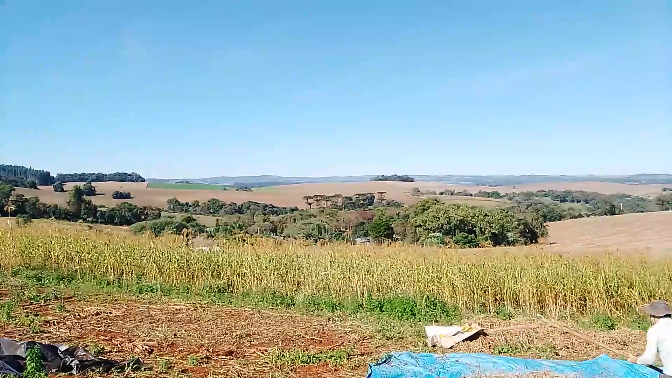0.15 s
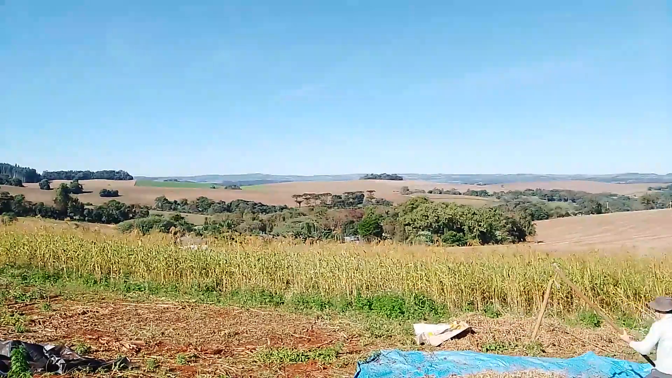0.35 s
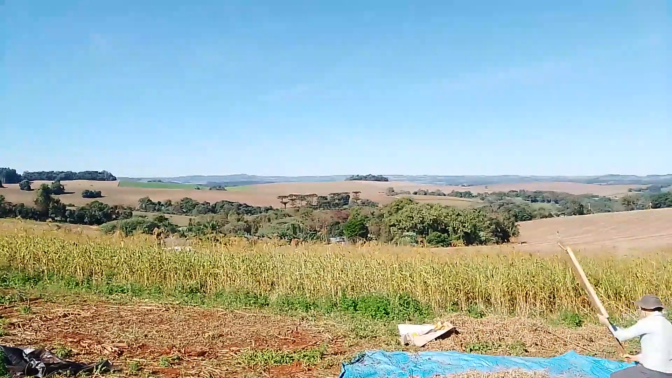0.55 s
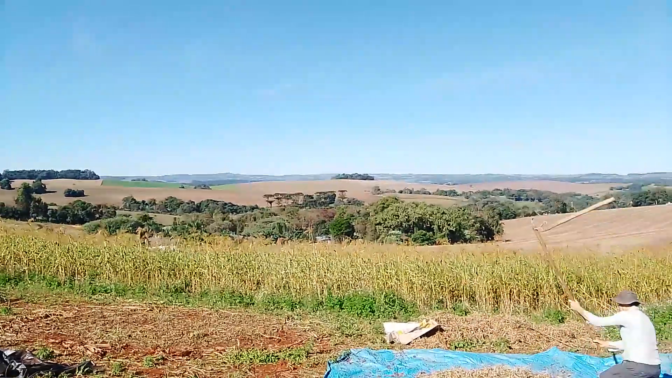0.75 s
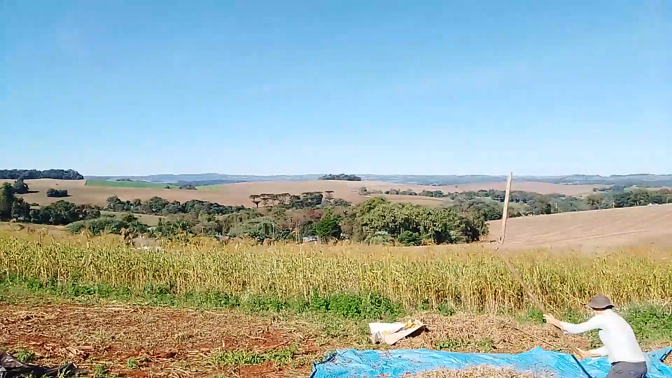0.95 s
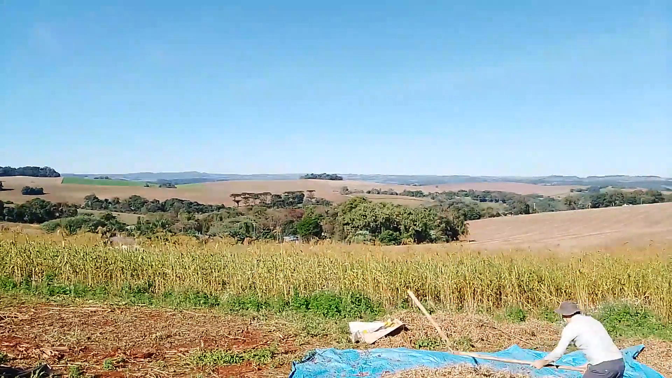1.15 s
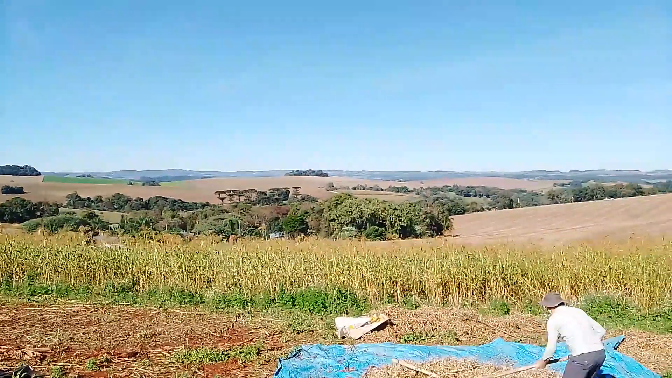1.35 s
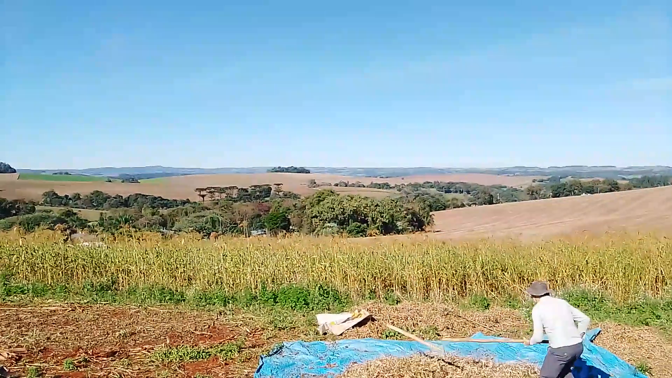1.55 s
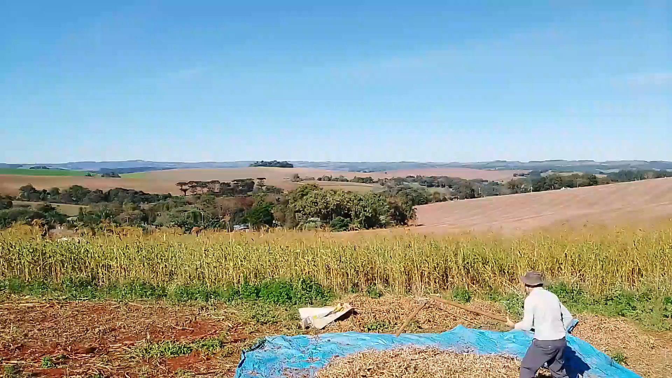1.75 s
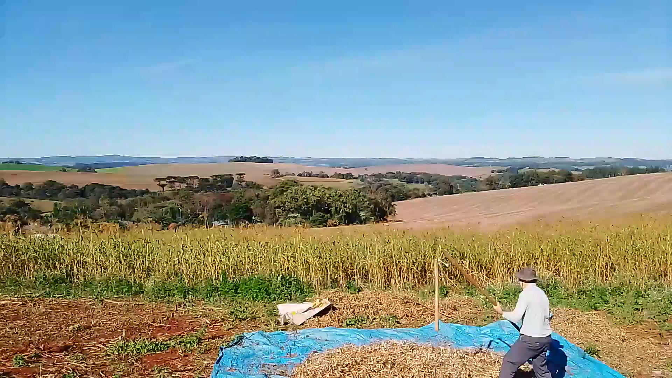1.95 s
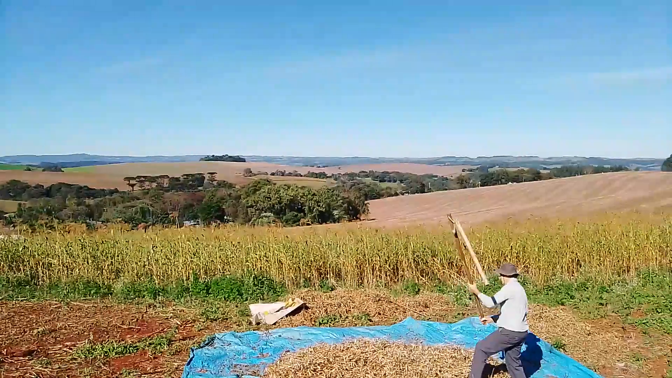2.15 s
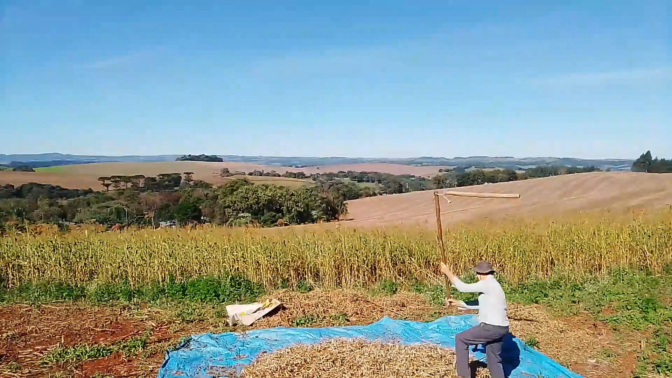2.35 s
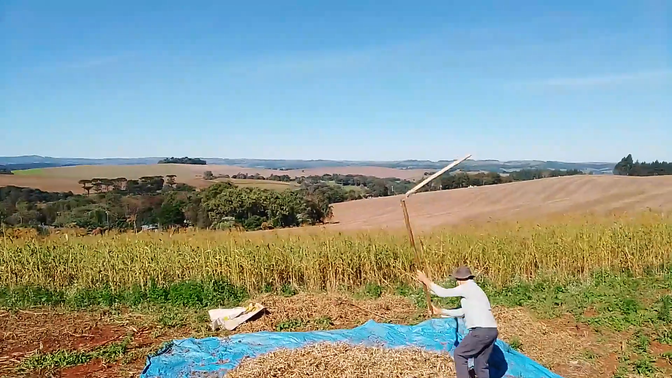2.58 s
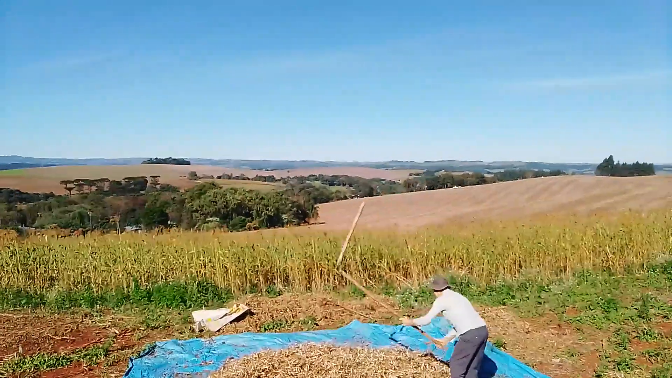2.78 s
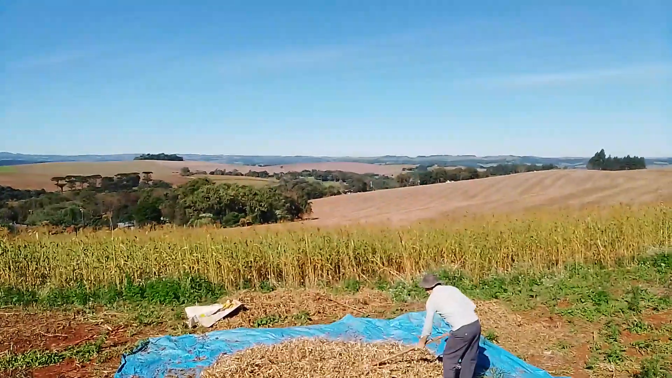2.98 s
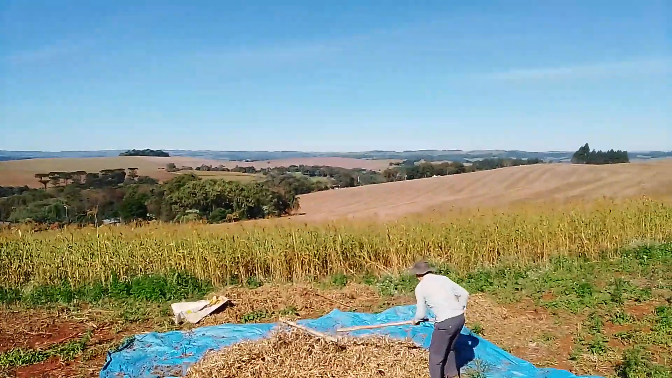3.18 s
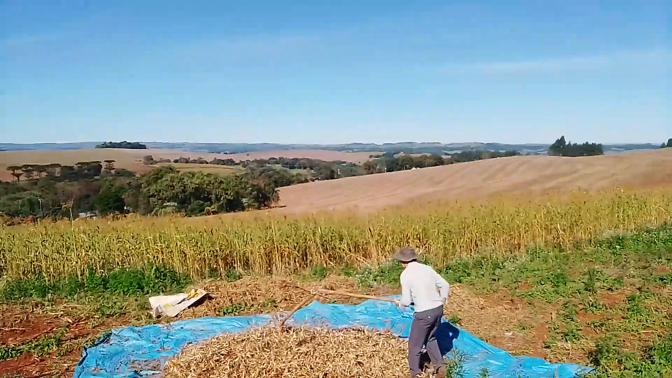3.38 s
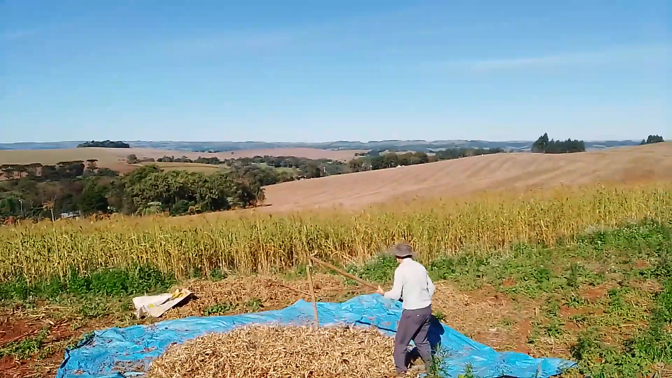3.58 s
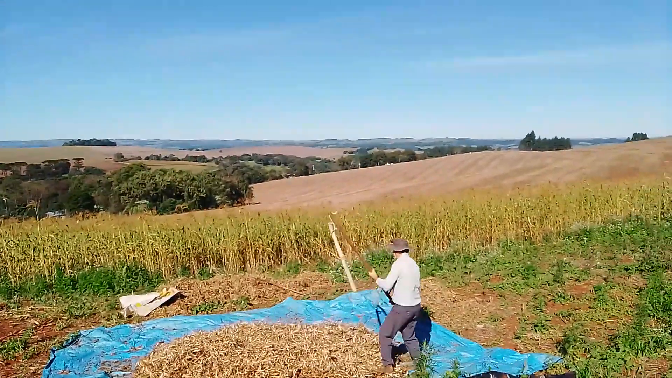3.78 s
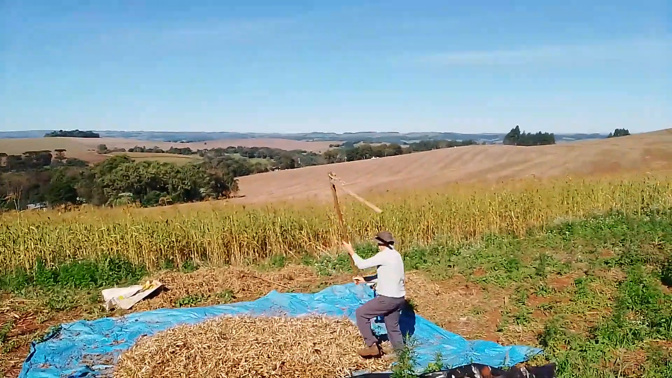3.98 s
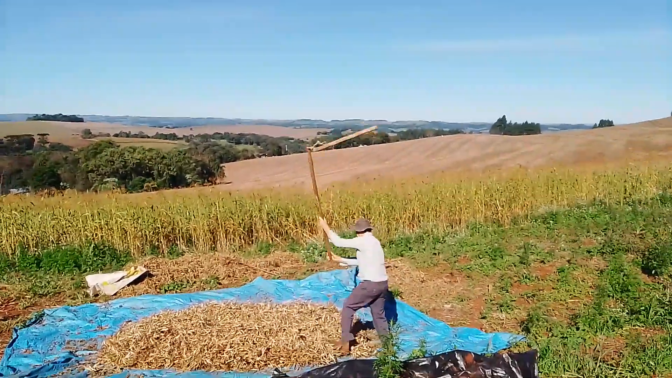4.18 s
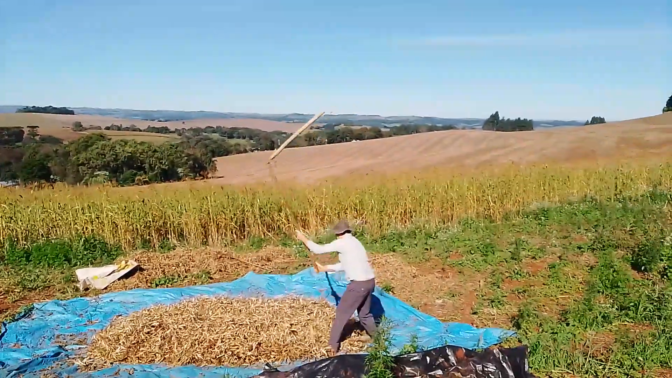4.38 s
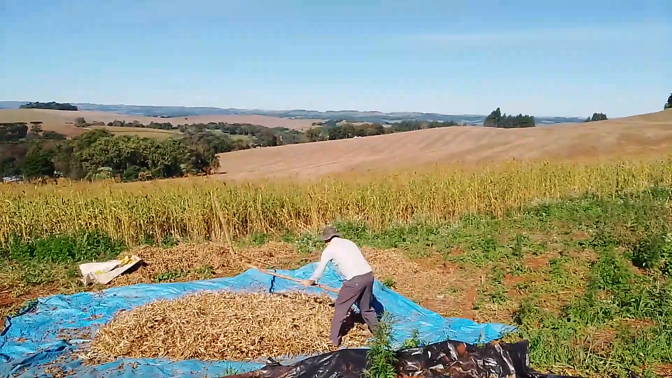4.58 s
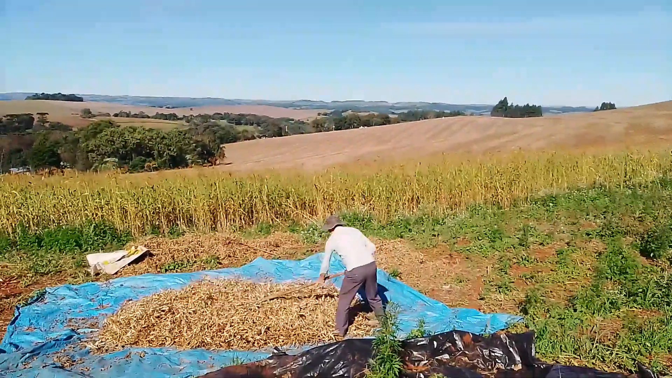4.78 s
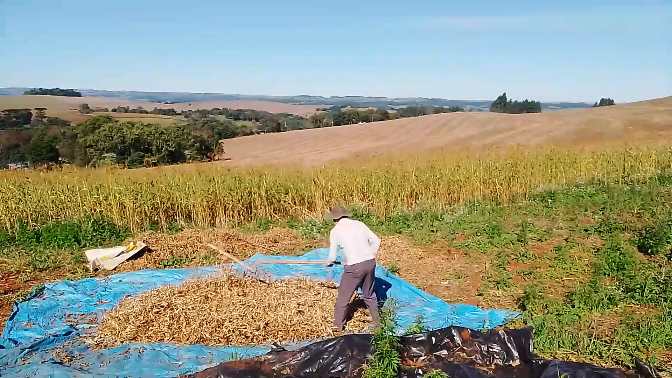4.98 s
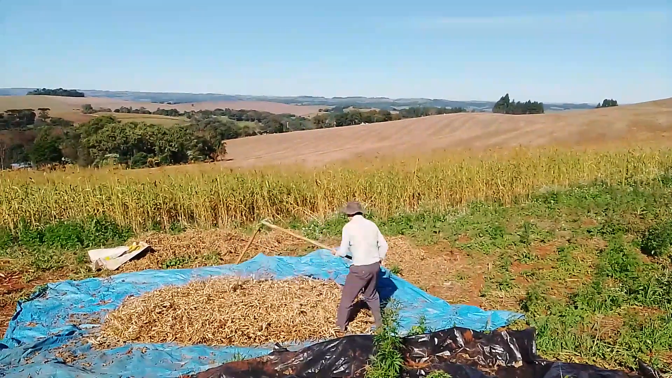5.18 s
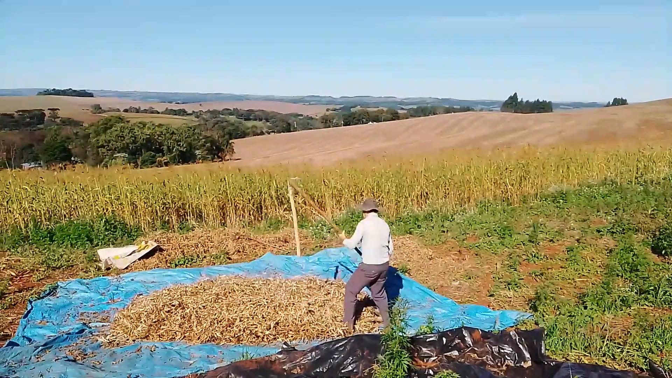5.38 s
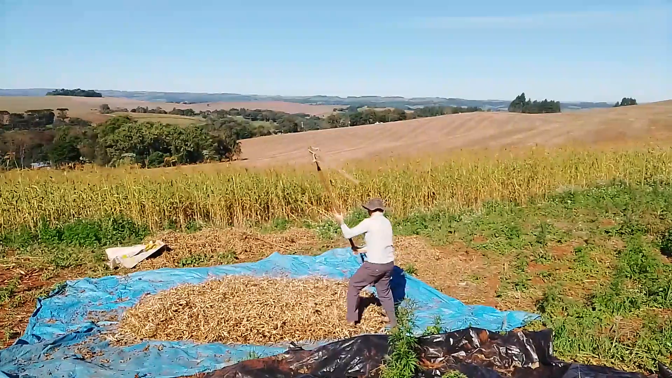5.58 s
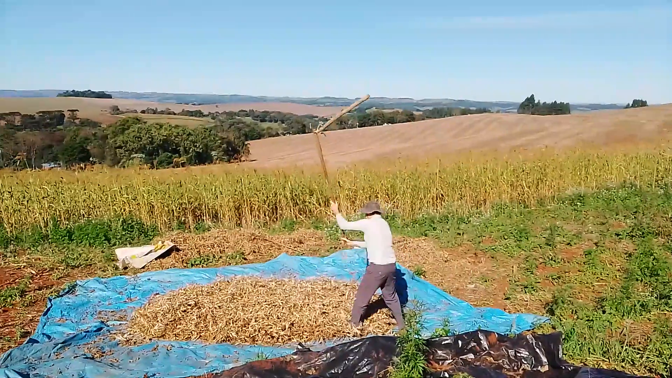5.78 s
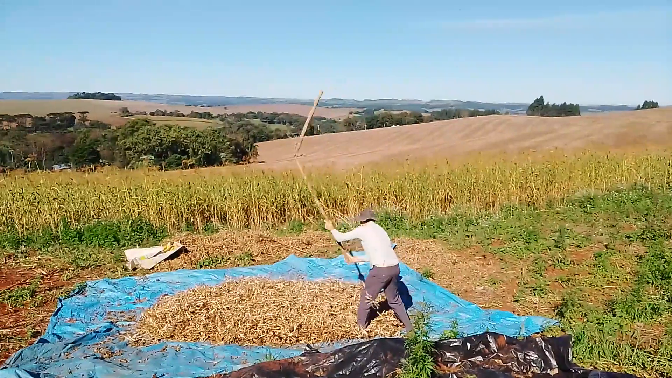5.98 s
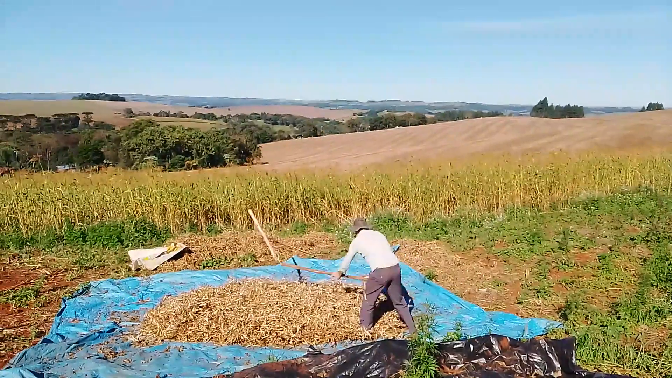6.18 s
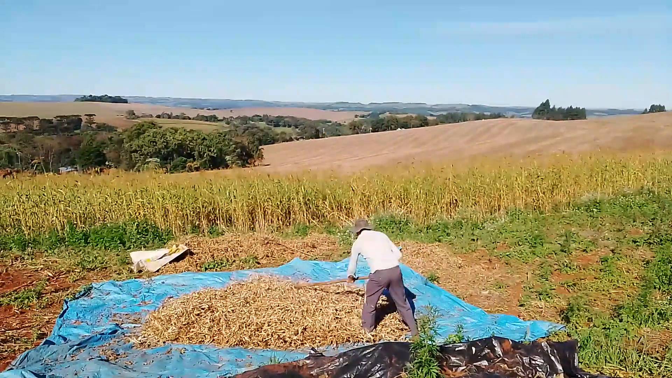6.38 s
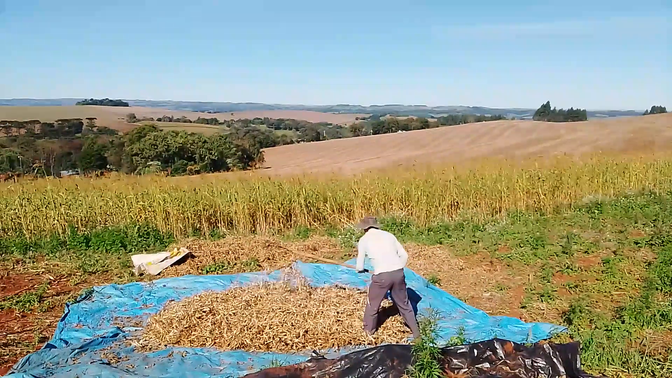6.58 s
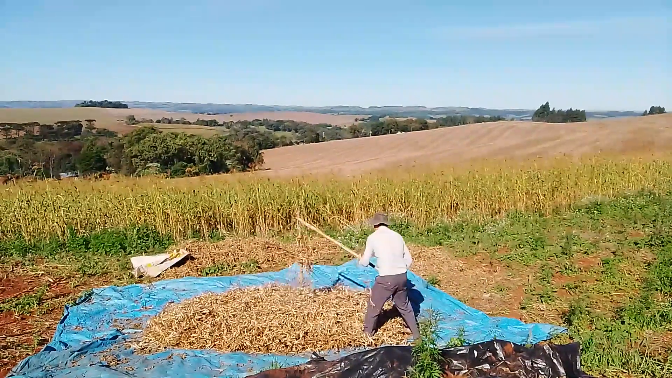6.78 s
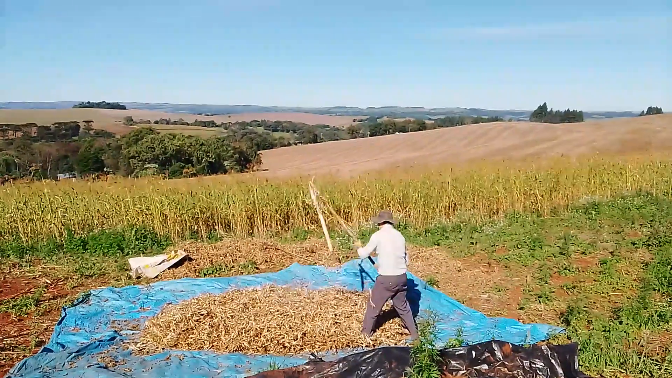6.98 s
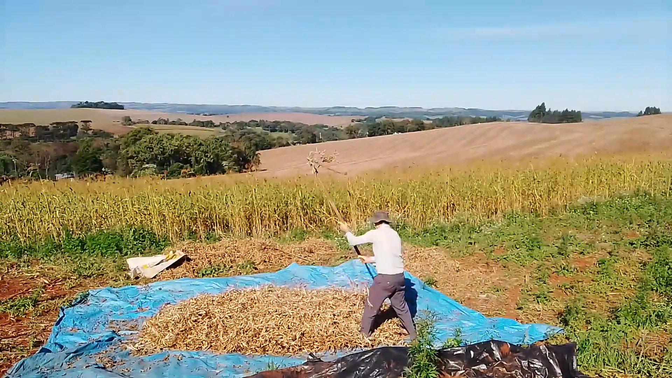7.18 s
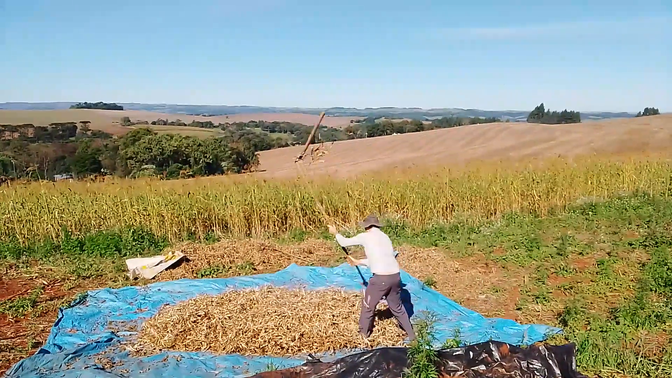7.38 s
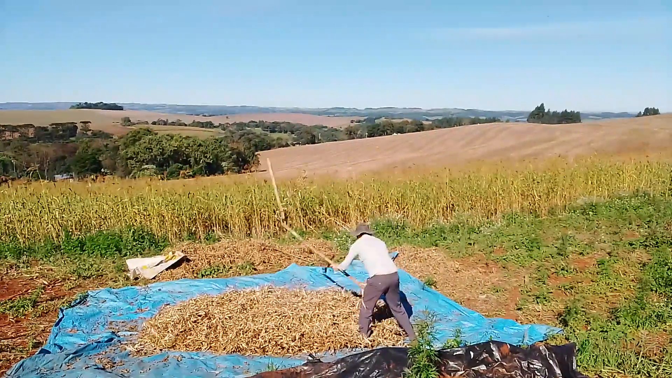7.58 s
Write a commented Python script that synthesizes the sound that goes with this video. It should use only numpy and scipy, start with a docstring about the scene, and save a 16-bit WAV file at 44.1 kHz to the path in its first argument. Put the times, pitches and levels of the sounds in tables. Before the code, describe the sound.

Four spaced blows crunch brittle pods on a tarp, with dry rustling, snapping stalks and soft wind buffeting the microphone.

```python
"""Chaff already showering onto a heap of dry pods and stalks is heard first, over a breeze and a faint hum.
Then stalks snap, cloth and straw rustle with each swing, and a wooden flail beats the heap on its tarp.
Brittle sounds are trains of random fractures, shaped in spectrum and level; thuds and pops are damped swings.
Breeze, gusts, hum and hiss are filtered noise: an open field, with the wind buffeting the microphone."""
import sys
import numpy as np
from scipy import signal
from scipy.fft import rfft, irfft
from scipy.io import wavfile
from scipy.ndimage import uniform_filter1d

SR = 44100
rng = np.random.default_rng(int(sys.argv[2]) if len(sys.argv) > 2 else 0)


def transcribe(signal):
    """Save signal, clipped to [-1, 1], as a 16-bit WAV file at the path in sys.argv[1]."""
    frames = np.atleast_2d(signal).T
    limited = np.clip(frames, -1, 1)
    pcm = np.round(limited * 32767).astype(np.int16)
    wavfile.write(sys.argv[1], SR, pcm)


N = 336960
TIME = np.arange(N) / SR


def amp(db):
    """Level to amplitude: 20 dB is a factor of ten."""
    return np.exp(np.asarray(db) * (np.log(10) / 20))


def evened(x):
    """Normalisation: scales to an rms of 1."""
    return x / np.sqrt(np.mean(x ** 2) + 1e-20)


def read(points, hz):
    """Log-frequency interpolation of a spectrum in dB."""
    f, db = np.transpose(points)
    return np.interp(np.log(hz + 1), np.log(f + 1), db)


def filtered(x, gain):
    """Linear filtering: multiplies the spectrum by a gain, then evens the rms to 1."""
    return evened(irfft(rfft(x) * gain, N))


def coloured(x, points):
    """Spectral shaping: filters x by a table of levels, with an rms of 1."""
    return filtered(x, amp(read(points, np.fft.rfftfreq(N, 1 / SR))))


def band(hz, centre, width):
    """Band-pass response: a broad, flat-topped resonance with steep skirts."""
    return 1 / (1 + (2 * (hz - centre) / width) ** 4) ** .7


def burst(s, rise, t60):
    """Exponential decay: a swell from s, slow at first, then a fall of 60 dB in t60."""
    swell = np.clip((TIME - s) / rise, 0, 1) ** 1.5
    return swell * amp(-60 * np.maximum(TIME - s - rise, 0) / t60)


def thump(s, hz, cycles):
    """Heavily damped oscillation: a push of air that peaks at s, with a swing or two."""
    t = (TIME - s) * hz
    return np.cos(2 * np.pi * t) * np.exp(-np.where(t < 0, (2 * t) ** 2, t / cycles))


def crackle(per_s, spread_db, wash):
    """Random impulse train: tiny fractures of uneven size over a wash of countless finer ones."""
    size = amp(spread_db * np.minimum(rng.exponential(1, N), 4))
    clicks = size * rng.choice([-1, 1], N) * (rng.random(N) < per_s / SR)
    return evened(clicks) + wash * rng.standard_normal(N)


def clumps(depth_db, per_s):
    """Random amplitude modulation: the gain jumps about, as events come in bunches."""
    knots = rng.standard_normal(N // 20)
    return amp(depth_db * np.interp(TIME * per_s, np.arange(len(knots)), knots))


def patchy(x, depth_db, frames, bins):
    """Random spectral modulation: narrow bands swell and fade while the overall level is kept."""
    z = signal.stft(x, SR, nperseg=512)[2]
    patches = uniform_filter1d(rng.standard_normal(z.shape), int(frames), axis=1)
    patches = uniform_filter1d(patches, int(bins), axis=0)
    gain = amp(depth_db * evened(patches))
    power = np.mean(abs(z) ** 2, axis=1, keepdims=True)
    gain /= np.sqrt((power * gain ** 2).sum(0) / power.sum())
    return signal.istft(z * gain, SR, nperseg=512)[1][:N]


STROKE_GRIP_S, STROKE_GROWTH_DB = 0.0088, 16.5


def stroke(start, rise, db, t60):
    """Friction: the gain of one push catches at once, grows until it lets go, then dies away."""
    age = np.maximum(TIME - start, 0)
    shape_db = STROKE_GROWTH_DB * np.minimum(age / rise - 1, 0) - 60 * np.maximum(age - rise, 0) / t60
    return np.minimum(age / STROKE_GRIP_S, 1) * amp(db + shape_db)


def blows_before(s):
    """Event count: the blows whose first touch comes before the time s."""
    return sum(touch < s for touch, *_ in FLAIL_BLOWS)


def strokes(rows, count):
    """Superposition: the summed gain of strokes that begin after the given number of blows."""
    return sum(stroke(*row) for row in rows if blows_before(row[0]) == count)


SETTLE_RISE_S, SETTLE_RELEASE_DB_PER_S = 0.11, 109
PATTER_DB, PATTER_T60_S, PATTER_S = -56, 3.3, 0.76  # the last seeds go on dropping much longer


def falling(start, db, sag, hold):
    """Granular flow: a shower of chaff swells, sags and runs out, leaving a longer patter."""
    age = np.maximum(TIME - start - SETTLE_RISE_S, 0)
    shower = amp(db - sag * age - SETTLE_RELEASE_DB_PER_S * np.maximum(age - hold, 0))
    patter = amp(PATTER_DB - 60 * age / PATTER_T60_S - SETTLE_RELEASE_DB_PER_S * np.maximum(age - PATTER_S, 0))
    return np.clip((TIME - start) / SETTLE_RISE_S, 0, 1) * np.hypot(shower, patter)


# chaff falling, under way at first, then after each blow:
# (start [s], level [dB], sag [dB/s], hold [s])
CHAFF_SHOWERS = [(-.12, -39, 67.5, 0.68), (1.427, -45, 23.5, 0.57), (3.128, -42, 24, .55),
                 (4.846, -44, 26.5, 0.34), (6.44, -43, -2, 0.23)]
# the stick drags through the straw as it is lifted off: (start [s], rise [s], level [dB], t60 [s])
STICK_DRAGS = [(1.64, 0.26, -41, 0.5), (2.15, 0.16, -60.5, 0.97), (2.48, 0.025, -69.5, 1),
               (3.66, 0.079, -68, 0.23), (3.91, 0.075, -64.5, 0.18), (6.87, 0.063, -43.5, 0.6),
               (6.94, 0.01, -38.5, 0.088), (7.145, 0.023, -68, 0.15)]
# the colour of the falling chaff and straw differs after each blow; one spectrum per shower:
# (frequency [Hz], relative density [dB per Hz])
STRAW_SPECTRA = [
    [(1180, -21), (2000, -20), (2740, -12), (2880, -18), (3810, -7), (4730, -8.5), (6250, -16),
     (7640, -5.5), (9830, -7), (11100, -0.5), (11800, -1.5), (12900, -13.5), (14300, -9.5), (16000, -17)],
    [(1180, -32), (2000, -28), (2160, -20), (3550, -18), (3940, -6), (4690, -7), (5070, -10.5),
     (5540, -5.5), (6420, -33), (7120, -6), (7570, -2.5), (10200, -2.5), (11300, 2), (14300, -12.5),
     (16000, -37.5)],
    [(1180, -13), (2000, -14.5), (2620, -19.5), (2860, -19), (3260, -24), (4260, -26), (4770, -17),
     (5830, -8), (7840, -16), (8780, -20), (9410, -5.5), (10700, 2.5), (12800, -3.5), (16000, -22)],
    [(1180, -16), (2000, -13), (2550, -28), (2780, -24), (3200, -21), (4190, -30), (6310, -6.5),
     (7840, -20.5), (8780, -21), (10100, -6), (11500, -2), (12900, -4.5), (16000, -34)],
    [(1180, -50), (2000, -24), (2260, -21.5), (2760, -31), (4120, -30.5), (5580, -11), (6310, -7),
     (7510, -32), (7980, -31.5), (9580, -2), (10900, 0), (12900, -4), (16000, -27)],
]
# dull body of the husks: (frequency [Hz], relative density [dB per Hz])
HUSK_SPECTRUM = [(200, -0.5), (600, -4.5), (1100, 12.5), (1600, 8.5), (2200, 1.5), (2900, -20), (4000, -75)]
# loose seeds and bits of chaff dropping on the tarp: (frequency [Hz], relative density [dB per Hz])
SEED_SPECTRUM = [(1000, -20), (3000, -11), (5000, -2), (7500, -11.5), (10000, 3.5), (13000, -6),
                 (15800, -9.5)]


def settling():
    """Level-dependent filtering: chaff falls, straw slides; faint rustle is narrowed, sparse seeds patter last."""
    ticks = crackle(per_s=2200, spread_db=3.2, wash=.95) * clumps(depth_db=1.15, per_s=170)
    ticks = patchy(ticks, depth_db=2.8, frames=45, bins=3)
    seeds = coloured(crackle(per_s=350, spread_db=2.5, wash=.9), SEED_SPECTRUM)
    husks = coloured(ticks, HUSK_SPECTRUM)
    out = np.zeros(N)
    for k, (shower, colour) in enumerate(zip(CHAFF_SHOWERS, STRAW_SPECTRA)):
        motion = falling(*shower) + strokes(STICK_DRAGS, count=k)
        fullness = motion / (motion + amp(-51))
        rustle_share = motion ** 2 / (motion ** 2 + amp(-64) ** 2)
        full = coloured(ticks, colour) + amp(-21.0) * husks
        # doubling the spectrum's contrast in dB narrows its peaks
        narrow = coloured(ticks, [(hz, 2 * db) for hz, db in colour])
        straw = fullness * full + (1 - fullness) * narrow
        out += motion * (rustle_share * straw + amp(-3.5) * (1 - rustle_share) * seeds)
    return out


BREEZE_GAIN_DB, LULL_DB = 1, -72.5  # the roar follows the breeze, but never falls below the lull
LOWEST_EDGE_HZ, HIGHEST_EDGE_HZ = 149.2, 1250  # limits of the low-pass edge
OPENS_AT_DB, OPENS_OVER_DB = -71.5, 5  # level at which the edge is midway, and the span of its move
# strength of the breeze, before its gain: (time [s], level [dB])
BREEZE_STRENGTH = [(0.0, -63), (0.4, -65), (0.9, -85.5), (1.0, -69), (1.5, -61.5), (1.7, -65), (1.9, -58.5),
                   (2.4, -64.5), (3.3, -55.5), (3.9, -53), (4.3, -60), (4.4, -54), (5.0, -55.5), (5.7, -68),
                   (5.9, -60), (7.2, -60.5), (7.4, -71.5), (7.64, -68)]
# spectrum of moving air, before the low-pass: (frequency [Hz], relative density [dB per Hz])
AIR_SPECTRUM = [(15, -68), (25, -15.5), (113, -3.5), (192, -5), (226, -4), (270, -8), (345, -6), (560, -8),
                (608, -1.5), (738, -6), (941, -6), (1200, -13), (1560, -41), (2640, -120)]


def breeze():
    """Filtered noise: a dull, patchy roar swells with the breeze, under a low-pass whose edge its level sets."""
    hz, s, z = signal.stft(rng.standard_normal(N), SR, nperseg=2048)
    strength_db = np.interp(TIME, *np.transpose(BREEZE_STRENGTH))
    opening = 1 / (1 + np.exp((OPENS_AT_DB - np.interp(s, TIME, strength_db)) / OPENS_OVER_DB))
    edge_hz = LOWEST_EDGE_HZ + (HIGHEST_EDGE_HZ - LOWEST_EDGE_HZ) * opening
    patches = uniform_filter1d(rng.standard_normal(z.shape), size=3, axis=0)
    patches = evened(uniform_filter1d(patches, size=12, axis=1))
    air_db = read(AIR_SPECTRUM, np.minimum(hz, 1000))[:, None]  # level above 1 kHz
    z = z * amp(air_db + 2 * patches) / np.hypot(1, (hz[:, None] / edge_hz) ** 10)
    roar = evened(signal.istft(z, SR, nperseg=2048)[1][:N])
    return roar * np.hypot(amp(strength_db + BREEZE_GAIN_DB), amp(LULL_DB))


HUM_HZ = 219.9
# level of the faint hum: (time [s], level [dB])
HUM_LEVEL = [(0, -79), (1.9, -83.5), (2.6, -65), (5, -65.5), (6.2, -71), (6.85, -58), (7.64, -73)]


def hum():
    """Narrow-band noise: a faint hum from far across the fields wavers as its random phases beat."""
    tone = filtered(rng.standard_normal(N), band(np.fft.rfftfreq(N, 1 / SR), HUM_HZ, width=10))
    return tone * amp(np.interp(TIME, *np.transpose(HUM_LEVEL)))


# steady hiss: (frequency [Hz], relative density [dB per Hz])
HISS_SPECTRUM = [(100, 11), (1000, 4.5), (1800, 0.5), (3000, 1), (4200, -1.5), (7000, -5.5), (10500, -3),
                 (15800, -4)]


def hiss():
    """Stationary noise: a soft, steady hiss lies under the field."""
    return amp(-74.0) * coloured(rng.standard_normal(N), HISS_SPECTRUM)


# single stalks snapping: (time [s], peak level [dB], pitch [Hz])
STALK_SNAPS = [(.388, -42.5, 11300), (1.038, -35, 10600), (1.055, -33, 10500), (1.091, -39.5, 10200),
               (1.229, -55, 10800), (1.279, -39, 10600), (2.068, -35, 11300), (2.167, -40.5, 12000),
               (2.284, -40, 9180), (2.847, -36.5, 9800), (4.456, -37, 9550), (4.582, -34.5, 9900),
               (4.687, -44, 9970), (6.119, -56, 10500), (6.178, -45, 11100), (6.35, -53.5, 10000),
               (6.787, -49, 10600), (6.958, -31, 10900)]


def snaps():
    """Brittle fracture: a dry stalk breaks in a few milliseconds of splintering around one pitch."""
    t, hz = np.arange(2048) / SR, np.fft.rfftfreq(2048, 1 / SR)
    out = np.zeros(N + 2048)
    for s, db, pitch_hz in STALK_SNAPS:
        response = band(hz, pitch_hz, width=2800) + amp(-26)
        splinter = irfft(rfft(rng.standard_normal(len(t))) * response)
        snap = splinter * amp(-60 * t / .018)
        out[round(s * SR):][:len(t)] += amp(db) * snap / abs(snap).max()
    return out[:N]


# scuffs underfoot, one or two to a swing:
# (start [s], rise [s], level before the mix [dB], t60 [s])
SWING_SCUFFS = [(.87, 0.18, -48.5, 0.35), (1.16, 0.048, -52, 1), (2.67, 0.18, -51, 0.23),
                (2.97, .025, -61.5, 0.26), (4.305, 0.18, -50, 0.34), (4.56, 0.029, -55.5, 0.71),
                (5.64, 0.26, -51.5, 0.68), (6.09, .03, -63.5, 0.47), (7.445, 0.096, -55.5, 0.48)]
# the two bands in which each swing rustles:
# (main centre [Hz], width [Hz], second centre [Hz], width [Hz], second relative to main [dB])
RUSTLE_BANDS = [(10700, 1300, 7700, 600, -9), (9450, 1500, 12600, 1200, -5), (10200, 2000, 5900, 1200, -10),
                (10050, 1600, 5950, 400, -7), (9900, 1200, 12000, 2500, -8)]


def swings():
    """Friction in two bands: tarp and straw rustle underfoot as the weight shifts, and a few seeds tick."""
    hz = np.fft.rfftfreq(N, 1 / SR)
    ticks = crackle(per_s=1800, spread_db=3.1, wash=1.1) * clumps(depth_db=1.4, per_s=90)
    ticks = patchy(ticks, depth_db=3.2, frames=24, bins=3)
    seeds = coloured(crackle(per_s=300, spread_db=2.5, wash=.9), SEED_SPECTRUM)
    broad = amp(-21.5) * hz / np.hypot(hz, 1800)
    out = np.zeros(N)
    for k, (main_hz, width, second_hz, second_width, second_db) in enumerate(RUSTLE_BANDS):
        colour = band(hz, main_hz, width) + amp(second_db) * band(hz, second_hz, second_width) + broad
        motion = strokes(SWING_SCUFFS, count=k)
        rustle_share = motion ** 2 / (motion ** 2 + amp(-63) ** 2)
        rustle = filtered(ticks, colour)
        out += motion * (rustle_share * rustle + amp(-2.0) * (1 - rustle_share) * seeds)
    return out


TURN_S = 2.65  # the heap is heard from the side until now, then from the front


def heap(x, side, front):
    """Directivity: the colour of a crackle depends on the direction from which the heap is heard."""
    return np.where(TIME < TURN_S, coloured(x, side), coloured(x, front))


CRUNCH_T60_S = 0.56
# blows of the flail: (first touch [s], rise [s], crunch [dB], time taken to reach the ground [s],
# thud [dB], thud pitch [Hz], knock [dB], splintering [dB])
FLAIL_BLOWS = [(1.352, 0.032, -24, 0.047, -30, 212, -39.5, -47),
               (3.059, 0.026, -23, .038, -33, 240, -37, -46),
               (4.796, 0.019, -24, 0.037, -32, 177, -35, -44.5),
               (6.362, 0.035, -26.5, .048, -35.5, 195, -37.5, -43.5)]
# narrow rings in the crunch: (time [s], pitch [Hz], width [Hz], level [dB])
CRUNCH_RINGS = [(1.36, 7660, 265, -30), (1.364, 11330, 636, -29)]
# crushed pods from the side: (frequency [Hz], relative density [dB per Hz])
SIDE_SPECTRUM = [(1180, -52), (2000, -17), (2160, -19.5), (3010, -23), (3140, -20), (3840, -15),
                 (3980, -12.5), (4820, -10), (6530, -19), (7700, -13.5), (9580, -4), (10600, -9),
                 (11400, -7), (15100, -16.5), (16000, -10.5)]
# crushed pods from the front: (frequency [Hz], relative density [dB per Hz])
FRONT_SPECTRUM = [(1180, -22), (2000, -7.5), (2550, -9), (3610, -16), (5830, -1.5), (8480, -12),
                  (9740, 2.5), (10900, 1), (12100, 1), (15100, -13), (16000, -4.5)]


def blows():
    """Mass fracture: the stick lands along its length and bursts thousands of pods; the crunch dies quickly."""
    crunch = sum(amp(db) * burst(s, rise, CRUNCH_T60_S) for s, rise, db, *_ in FLAIL_BLOWS)
    fractures = crackle(per_s=7500, spread_db=2.4, wash=.75) * clumps(depth_db=1.05, per_s=380)
    fractures = patchy(fractures, depth_db=2.3, frames=12, bins=3)
    hz = np.fft.rfftfreq(N, 1 / SR)
    rings = np.zeros(N)
    for s, pitch_hz, width, db in CRUNCH_RINGS:
        ring = filtered(fractures, band(hz, pitch_hz, width))
        rings += amp(db) * burst(s, rise=0.012, t60=0.16) * ring
    return crunch * heap(fractures, SIDE_SPECTRUM, FRONT_SPECTRUM) + rings


PRESS_SHARE = 0.54  # how far into the rise of the crunch the stick meets the thick stalks
PRESS_ATTACK_S, PRESS_BUILD_DB, PRESS_T60_S = 0.0023, 6, 0.098  # knocking builds as the heap is squeezed
# knocking of the thick stalks: (frequency [Hz], relative density [dB per Hz])
STALK_SPECTRUM = [(88, -38), (150, -12.5), (359, -1), (477, -5), (544, -2.5), (683, -4), (867, 3.5),
                  (1350, -9.5), (1590, -6.5), (2600, -67), (3380, -43.5), (5720, -120)]


def landings():
    """Compression and impact: thick stalks splinter and knock harder until the ground stops the stick."""
    stalks = coloured(crackle(per_s=1500, spread_db=2, wash=.7), STALK_SPECTRUM)
    stalks = patchy(stalks, depth_db=3, frames=24, bins=2)
    splinters = coloured(crackle(per_s=2000, spread_db=2.5, wash=.8), HUSK_SPECTRUM)
    out = np.zeros(N)
    for touch, rise, _, sinking, thud_db, hz, knock_db, splinter_db in FLAIL_BLOWS:
        meets, ground = touch + PRESS_SHARE * rise, touch + sinking
        press_db = np.interp(TIME, [meets, ground], [-PRESS_BUILD_DB, 0])
        press_db = press_db - 60 * np.maximum(TIME - ground, 0) / PRESS_T60_S
        out += np.clip((TIME - meets) / PRESS_ATTACK_S, 0, 1) * amp(knock_db + press_db) * stalks
        out += amp(splinter_db) * burst(meets, rise=0.013, t60=0.49) * splinters
        out += amp(thud_db) * thump(ground, hz, cycles=0.6)
    return out


# gusts on the microphone: (start [s], rise [s], level before the rumble gain [dB], t60 [s])
MIC_GUSTS = [(2.35, .11, -49, 0.84), (3.6, .2, -56, 4.7), (5.522, 0.081, -51.5, 0.54),
             (5.79, 0.046, -38.5, 0.25), (5.885, 0.038, -33.5, 0.32), (6.6, .25, -56.5, 1.27),
             (7.28, 0.04, -53.5, 1.5), (7.56, 0.036, -47.5, .4)]
# rumble of the gusts: (frequency [Hz], relative density [dB per Hz])
RUMBLE_SPECTRUM = [(20, -7), (60, -15), (120, -0.5), (200, -6.5), (320, -16.5), (600, -30.5), (1200, -103)]
# puffs of air and small knocks: (time [s], peak level [dB], pitch [Hz])
AIR_BUMPS = [(2.457, -42.5, 125), (2.523, -36.5, 143), (3.962, -38, 205), (4.074, -31.5, 563),
             (4.122, -41.5, 162), (4.258, -38, 179.5), (5.617, -37.5, 208), (5.812, -34, 187),
             (5.844, -31.5, 184), (5.922, -29.5, 147), (5.949, -30, 212), (5.975, -22, 258),
             (5.987, -34, 199), (7.258, -48.5, 620), (7.342, -46.5, 182), (7.367, -46.5, 141),
             (7.511, -50, 1070), (7.627, -39, 123)]


def buffets():
    """Turbulent pressure: eddies rumble and pop on the microphone."""
    gusts = sum(amp(db) * burst(s, rise, t60) for s, rise, db, t60 in MIC_GUSTS)
    rumble = coloured(rng.standard_normal(N), RUMBLE_SPECTRUM) * clumps(depth_db=5.5, per_s=73)
    pops = sum(amp(db) * thump(s, hz, cycles=0.61) for s, db, hz in AIR_BUMPS)
    return amp(-4.5) * gusts * rumble + pops


def scene():
    """Superposition: the threshing, the wind and the faint hum and hiss of the field add."""
    threshing = settling() + snaps() + amp(2.0) * swings() + blows() + landings()
    return (threshing + breeze() + hum() + hiss() + buffets())[None]


EDGE_HZ = 15900  # upper band limit


def record(dry):
    """Band limiting: a small microphone loses the deepest bass, then a steep low-pass cuts the top."""
    thin = signal.sosfilt(signal.butter(2, 55, "highpass", fs=SR, output="sos"), dry)
    lowpass = signal.firwin(511, EDGE_HZ, window=("kaiser", 8), fs=SR)
    return signal.oaconvolve(thin, lowpass[None], "same")


dry = scene()
out = record(dry)
transcribe(out)
```